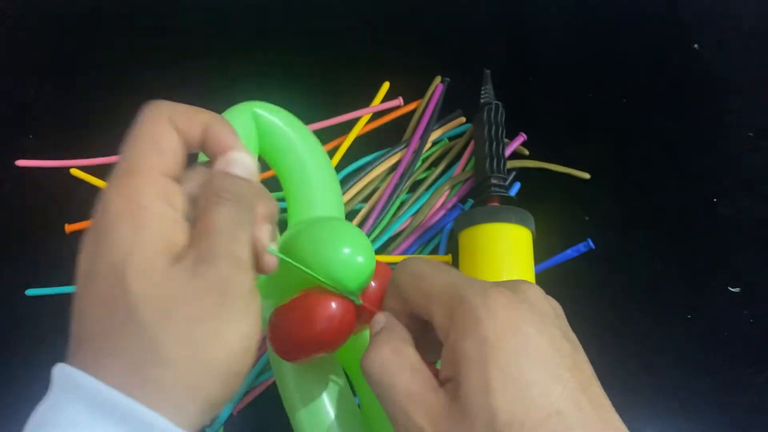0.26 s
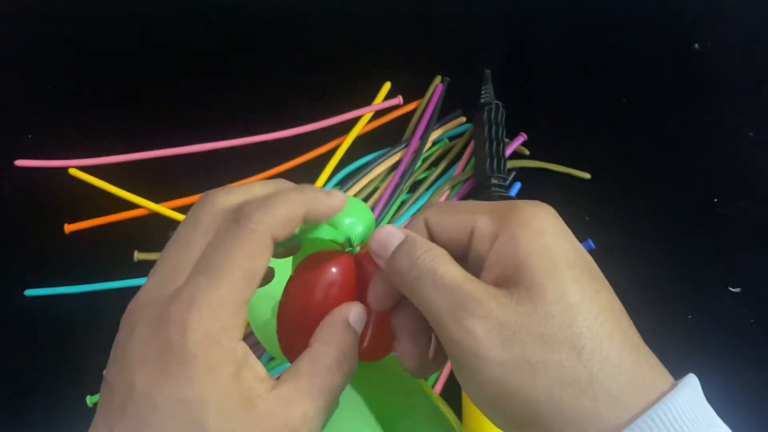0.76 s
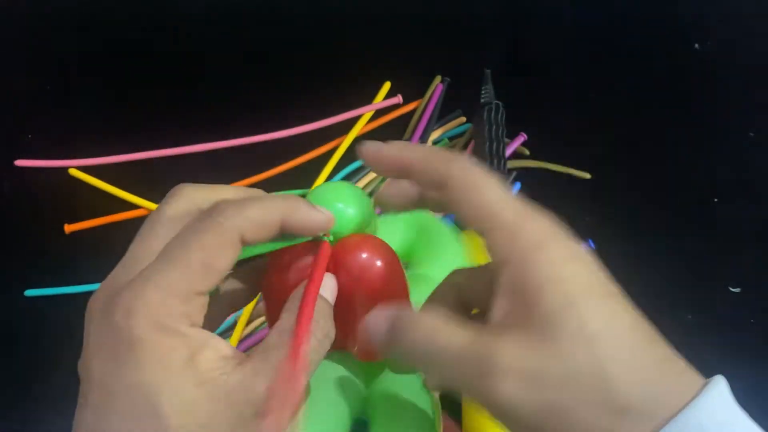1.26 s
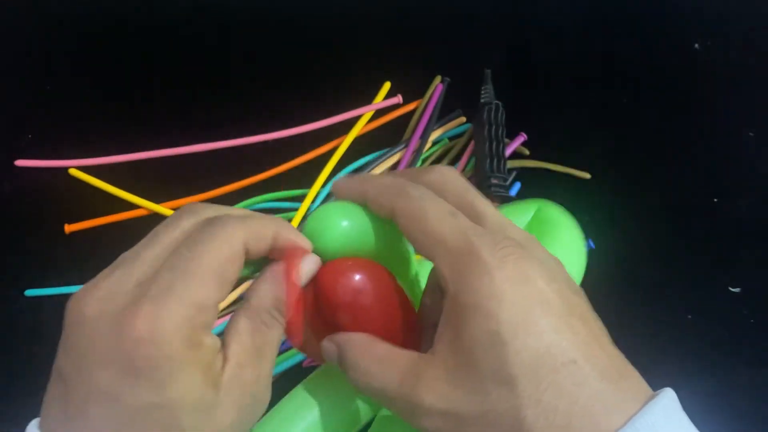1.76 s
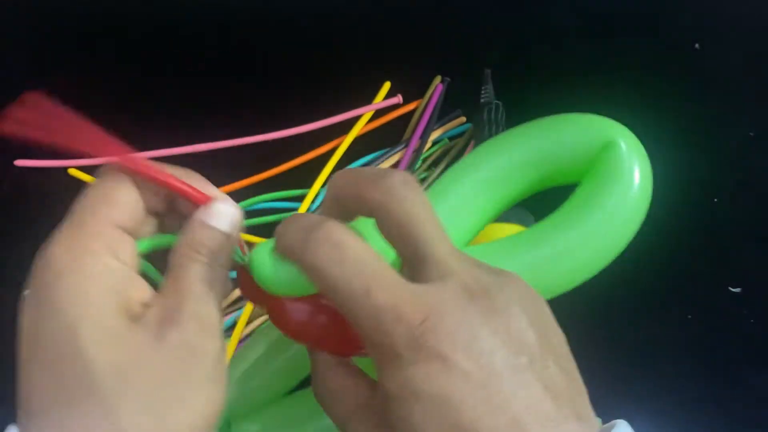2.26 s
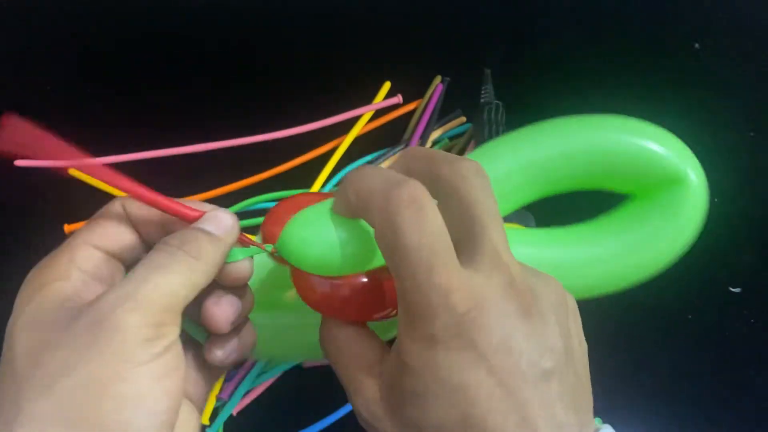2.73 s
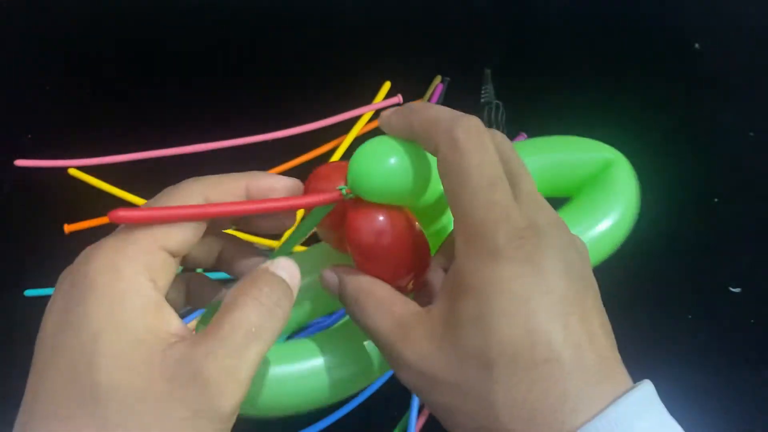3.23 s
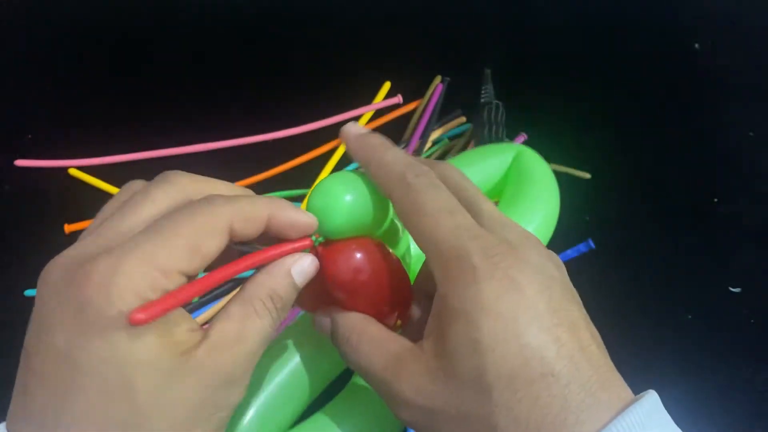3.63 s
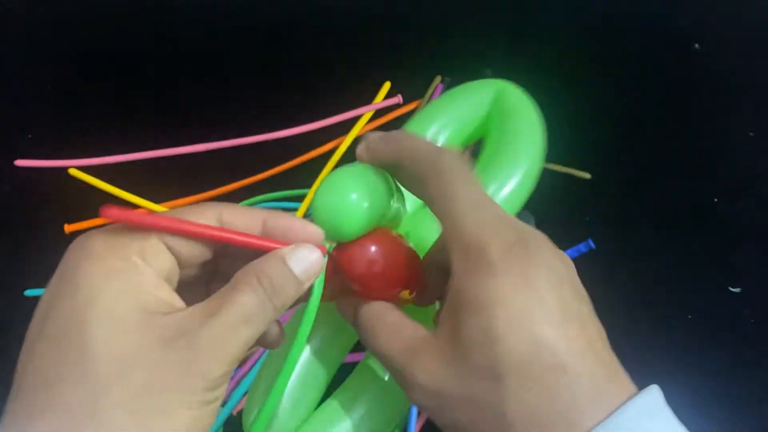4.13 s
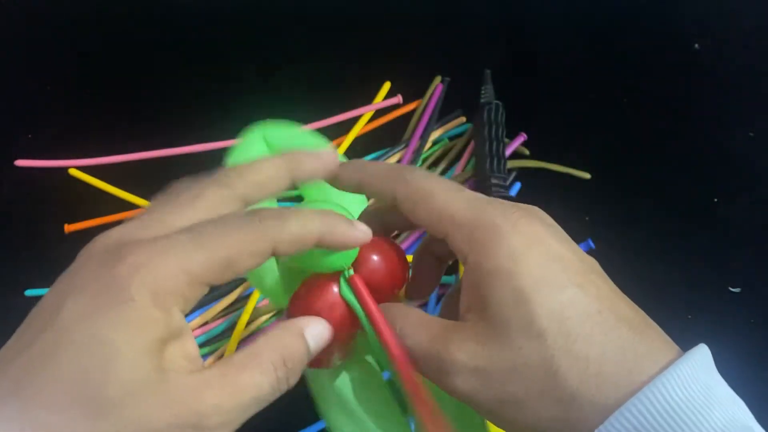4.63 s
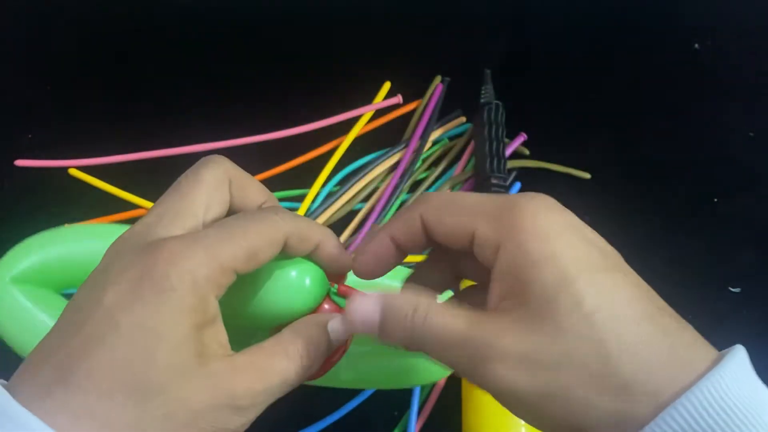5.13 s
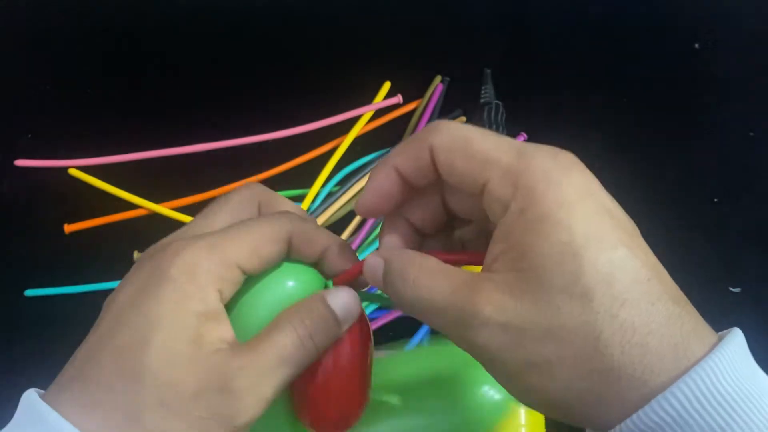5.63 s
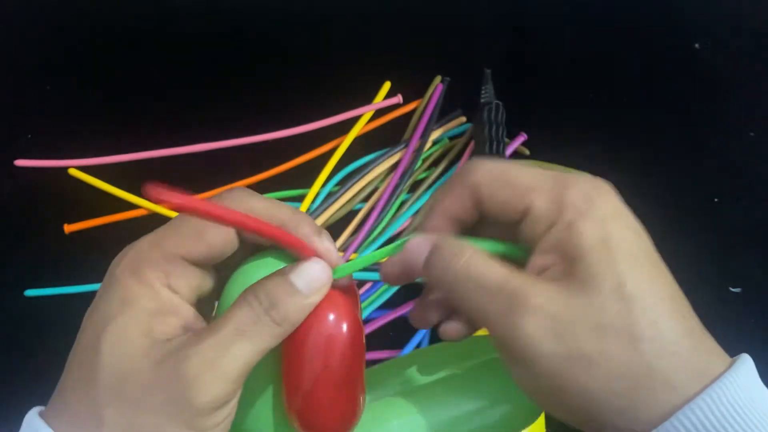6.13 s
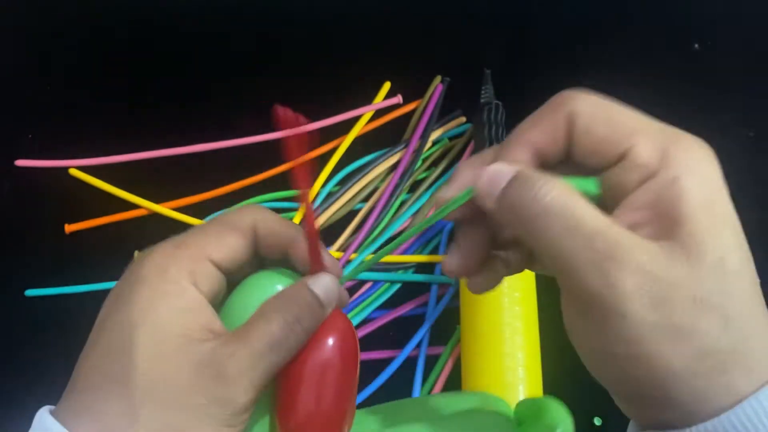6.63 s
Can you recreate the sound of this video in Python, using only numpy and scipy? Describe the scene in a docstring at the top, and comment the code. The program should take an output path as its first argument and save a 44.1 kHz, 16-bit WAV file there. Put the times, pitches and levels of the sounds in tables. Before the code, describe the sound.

Inflated balloons are rubbed, twisted and tied by hand over a table in a small room, heard from very near. Crackly finger strokes and a hollow little boing lead into an uneven run of squeaky rubber snaps, with occasional soft thumps and a low rumble. Toward the end the handling thins into small sharp ticks, a quick tightening creak, short grunting drags and a last pair of slips.

```python
"""In a small room, over a table, hands twist and knot long latex balloons close to the microphone.
The rubber sticks and slips: each slip snaps and sends a wave round the tight skin, highs first.
Fingers swish and crackle over the rubber, pluck hollow falling boings and drag out short grunts.
A pinched neck ticks and a knot creaks tight. The balloon's slowest waves arrive as soft, deep thumps,
mostly just after a slip, and the handling makes a low rumble."""
import sys
import numpy as np
from scipy import signal
from scipy.fft import rfft, irfft, next_fast_len
from scipy.io import wavfile
from scipy.ndimage import map_coordinates

SR = 44100
rng = np.random.default_rng(int(sys.argv[2]) if len(sys.argv) > 2 else 0)


def dump(signal):
    """Clip the signal to [-1, 1] and save it as 16-bit WAV at the path in sys.argv[1]."""
    limited = np.clip(np.atleast_2d(signal).T, -1, 1)
    pcm = np.round(limited * 32767).astype(np.int16)
    wavfile.write(sys.argv[1], SR, pcm)


N = 303849
SIZE = 4096  # samples in one short sound
HZ = np.maximum(np.fft.rfftfreq(SIZE, 1 / SR), 1)  # the frequencies in a short sound
AGE = np.arange(SIZE) / SR  # seconds since it began
SIDES = np.array([[1], [-1]])  # left, right

# slips of the rubber: t/s, ring level/dB, ring f/Hz, snap level/dB, sway level/dB
SLIPS = [(0.056, -50.5, 1280, -55.5, -86), (.169, -52, 1630, -58.5, -70.5),
         (0.3276, -51, 2300, -49.5, -57.5), (0.3548, -38, 1340, -37.5, -49.5),
         (0.4134, -34, 1460, -35.5, -53), (0.4286, -38, 874, -43, -44), (0.7436, -44, 1166, -53, -47.5),
         (.758, -41, 1100, -46, -48.5), (0.8271, -36.5, 970, -43.5, -35), (0.9243, -36, 691, -55, -45),
         (0.9406, -39.5, 1040, -47, -40), (1.056, -53.5, 1490, -62.5, -56.5),
         (1.206, -48.5, 1050, -57, -48.5), (1.228, -47.5, 1650, -60.5, -60), (1.2692, -52, 910, -55.5, -53),
         (1.3079, -38, 1010, -53, -41.5), (1.388, -44.5, 1076, -53.5, -45), (1.4494, -37.5, 1360, -65, -50),
         (1.4811, -48, 1330, -52.5, -52), (1.7835, -32, 1246, -37, -39.5), (1.797, -43.5, 1320, -52, -56),
         (1.8169, -40.5, 1660, -44, -47), (1.8552, -50, 1460, -41, -43.5), (1.8884, -45.5, 840, -55, -47),
         (1.913, -44.5, 1300, -51.5, -46.5), (1.9622, -47, 1300, -51, -51), (1.976, -42, 1400, -50.5, -47),
         (1.996, -46.5, 1370, -54, -48), (2.0096, -43.5, 965, -49, -44), (2.02, -41, 540, -55.5, -35),
         (2.104, -44.5, 1810, -56.5, -56.5), (2.1498, -37, 1030, -43, -43.5),
         (2.19, -40.5, 940, -51.5, -42.5), (2.213, -35, 986, -45.5, -38), (2.231, -44.5, 544, -58.5, -77),
         (2.3297, -27.5, 1570, -33.5, -36.5), (2.5117, -38.5, 1290, -46, -51),
         (2.525, -30.5, 1485, -43, -39.5), (2.568, -39.5, 790, -66, -49), (2.621, -38.5, 1400, -47.5, -37),
         (2.6395, -30, 906, -39, -35), (2.771, -36.5, 1150, -49.5, -52),
         (2.8267, -34.5, 1200, -40.5, -35.5), (2.878, -34.5, 1454, -39.5, -40.5),
         (2.9635, -40.5, 897, -51, -52), (2.997, -46, 820, -57.5, -51.5), (3.101, -38, 1296, -47, -47),
         (3.1468, -44, 744, -54.5, -50.5), (3.195, -40.5, 1030, -41, -44.5), (3.204, -43, 960, -52, -59),
         (3.5786, -44.5, 890, -54, -74), (3.598, -46.5, 1370, -52.5, -58),
         (3.7009, -35.5, 1030, -42.5, -49), (3.7485, -38.5, 1430, -35, -45),
         (3.8454, -51, 1103, -61.5, -57.5), (3.94, -33, 756, -44, -43.5), (4.0066, -39, 1030, -51, -60),
         (4.0391, -40.5, 1220, -46, -52), (4.059, -34.5, 980, -39.5, -51), (4.1866, -41, 1700, -49.5, -51),
         (4.2297, -23, 1080, -31, -41), (4.3272, -41, 1810, -46.5, -48), (4.44, -42, 860, -50, -75),
         (4.46, -48, 1770, -53.5, -54), (4.555, -40.5, 980, -44.5, -59), (4.815, -45.5, 1380, -52, -53),
         (4.8562, -43.5, 796, -62, -51), (4.8851, -43, 1610, -49.5, -49), (4.898, -34.5, 1200, -40.5, -39),
         (4.9713, -46, 2050, -53, -74), (5.075, -49.5, 1230, -54.5, -70), (5.0901, -48, 1160, -51.5, -79),
         (5.2193, -39, 1055, -47.5, -85), (5.527, -50.5, 1420, -54, -48.5),
         (5.6835, -43.5, 1160, -51, -48.5), (5.904, -52.5, 1136, -59.5, -57),
         (5.9786, -48.5, 1310, -51.5, -56), (6.0343, -46.5, 1420, -46.5, -48),
         (6.1344, -47.5, 884, -65, -50.5), (6.3041, -40.5, 560, -55, -38.5),
         (6.5066, -47.5, 1420, -57, -55.5), (6.68, -55, 860, -63.5, -63.5),
         (6.8226, -34, 960, -44.5, -49.5), (6.8434, -39, 903, -79, -50.5)]
# tone colour of a snap: f/Hz, level/dB
SNAP_COLOUR = [(900, -21.5), (2000, -2.5), (3000, 4.5), (4700, 0.5), (6800, -2), (8400, -6), (10000, 1.5),
               (11300, -6.5), (12300, -15.5), (14000, -7.5), (16000, -28)]


def from_db(db):
    """Turn decibels into a gain to multiply by."""
    return 10 ** (np.asarray(db) / 20)


def at_hz(points, hz):
    """Read between the rows of a table, with frequency spaced in octaves."""
    freqs, values = np.transpose(points)
    return np.interp(np.log(np.maximum(hz, 1)), np.log(freqs), values)


def add(out, s, sound):
    """Mix a short sound in at s seconds."""
    start = int(np.clip(round(s * SR), 0, N - 1))
    out[:, start:start + sound.shape[1]] += sound[:, :N - start]


def stereo_noise(size, colour=None):
    """Noise of strength 1, alike on both sides in the bass and unrelated in the treble."""
    # how alike scattered sound is at the two microphones: f/Hz, likeness (1 = the same)
    likeness = [(60, 0.94), (300, 0.73), (700, 0.7), (1400, 0.063), (2500, 0.019)]
    length = next_fast_len(size)
    hz = np.fft.rfftfreq(length, 1 / SR)
    mid, side = rfft(rng.standard_normal((2, length)))
    alike = at_hz(likeness, hz)
    spectrum = np.sqrt(1 + alike) * mid + np.sqrt(1 - alike) * side * SIDES
    gain = from_db(at_hz(colour, hz)) if colour else 1
    x = irfft(spectrum * gain, length)[:, :size]
    return x / x.std()


def resonance(centre_hz, q):
    """Favour one pitch; a higher q rings longer and purer."""
    return 1 / (1 + 1j * q * (HZ / centre_hz - centre_hz / HZ))


def travel(seconds, centre_hz, spread=.7):
    """Low waves cross the skin more slowly than high ones, so a click becomes a falling chirp."""
    power = 1 - spread
    return np.exp(-2j * np.pi * seconds * centre_hz * (HZ / centre_hz) ** power / power)


def scatter(fade_s, echo_db):
    """The direct wave plus its echoes among balloons and hands, which fall 60 dB in fade_s."""
    echoes = stereo_noise(SIZE) * from_db(-60 * AGE / fade_s)
    echoes /= np.sqrt(np.sum(echoes ** 2) / 2)
    return 1 + from_db(echo_db) * rfft(echoes)


def burst(spectrum):
    """Turn a spectrum into a short sound with the energy of 10 ms at strength 1."""
    end_fade = np.minimum(1, 4 * (1 - AGE / AGE[-1]))
    x = irfft(spectrum) * end_fade
    return x / np.sqrt(np.sum(x ** 2) / 2 / (SR / 100))


def sharp_pulse(colour):
    """Spectrum of the shortest click with this tone colour that does not sound early."""
    cepstrum = irfft(np.log(from_db(at_hz(colour, HZ))))
    forward_only = np.r_[1, np.full(SIZE // 2 - 1, 2), 1, np.zeros(SIZE // 2 - 1)]
    return np.exp(rfft(cepstrum * forward_only))


def clumps(per_s):
    """The grip comes and goes: a random curve between -2 and 1."""
    grip = map_coordinates(rng.standard_normal(N), [np.arange(N) / SR * per_s], order=1)
    return np.clip(grip, -2, 1)


def still_air(level_db=-72.5):
    """The faint, steady hush of the room."""
    # tone colour of the hush: f/Hz, level/dB
    colour = [(150, -2.5), (700, 0.5), (1500, -13.5), (3000, -16), (8400, -40.5), (10000, -33.5),
              (12200, -37), (16000, -47.5)]
    return from_db(level_db) * stereo_noise(N, colour)


def rumble():
    """Handling makes a low rumble, strongest while the balloon figure is turned over."""
    # loudness of the rumble: t/s, level/dB
    levels = [(0, -68), (.5, -58), (1.7, -61), (2.8, -51), (3.45, -60), (3.85, -55), (4.45, -60.5),
              (4.9, -56), (6.89, -67.5)]
    # its tone colour: f/Hz, level/dB
    colour = [(24, -62), (33, -35), (46, 4), (70, 5), (100, -5), (160, -5.5), (300, -23.5), (800, -74.5)]
    level_db = np.interp(np.arange(N) / SR, *np.transpose(levels))
    return from_db(level_db) * stereo_noise(N, colour)


def stroke_gains(swell_share=.15, sag_db_per_s=20.5, release_s=.029, resting_db=-89):
    """Gains for crackle and hiss: each finger stroke swells, eases off and lets go."""
    # strokes over the rubber: start/s, end/s, crackle level/dB, hiss level/dB
    strokes = [(0.376, 0.514, -47, -65), (0.575, 0.68, -53, -73.5), (0.784, 1.064, -56.5, -90),
               (1.209, 1.34, -49, -69.5), (1.405, 1.726, -54.5, -80), (1.788, 2.033, -52.5, -86),
               (2.184, 2.188, -43.5, -56), (2.79, 3.19, -54, -70), (3.678, 3.689, -40.5, -86),
               (3.996, 4.096, -43.5, -68), (4.479, 4.571, -55.5, -81), (4.734, 4.96, -55.5, -63.5),
               (5.006, 5.168, -55, -90), (5.317, 5.48, -47, -75), (5.729, 5.738, -48, -59.5),
               (5.928, 6.093, -53.5, -64), (6.229, 6.338, -57.5, -56)]
    age = np.arange(SR) / SR
    power = np.full((2, N), from_db(resting_db) ** 2)
    for start, end, crackle_db, hiss_db in strokes:
        length = max(end - start, .01)
        hold = np.tanh(age / (swell_share * length)) * from_db(-sag_db_per_s * age)
        release = np.exp(-np.maximum(age - length, 0) / release_s)
        add(power, start, (from_db([[crackle_db], [hiss_db]]) * hold * release) ** 2)
    return np.sqrt(power)


def creep_gain(against_snap_db=-16, rise_s=.003):
    """Gain of the hiss just before each slip: the rubber slides faster and faster, then lets go."""
    gain = np.zeros((1, N))
    ramp = np.exp(-AGE[:SIZE // 4][::-1] / rise_s)
    for s, _, _, snap_db, _ in SLIPS:
        add(gain, s - len(ramp) / SR, from_db(snap_db + against_snap_db) * ramp[None])
    return gain


def swishes(gain, boost_db=2, spurt_db=8.5):
    """Sliding skin hisses in uneven spurts."""
    # tone colour of the hiss: f/Hz, level/dB
    colour = [(400, -20), (1200, 6), (3000, 1), (6500, 1.5), (8400, -9), (10000, 4.5), (11300, -1),
              (12300, -11), (14000, -9), (16000, -14)]
    return gain * from_db(boost_db + spurt_db * clumps(per_s=130)) * stereo_noise(N, colour)


def skin_ring(centre_hz, travel_s, q, top_hz=6000, hum_db=-30):
    """The tight skin chirps and hums briefly; the wave comes round again, weaker and more drawn out."""
    lap_s = 3 / centre_hz * rng.uniform(.5997, 1.5)
    second_lap = from_db(-8) * rng.choice([-1, 1]) * travel(lap_s, centre_hz)
    tone = resonance(centre_hz, q) + from_db(hum_db) * resonance(.878 * centre_hz, q=6.6)
    treble_cut = 1 / (1 + np.sqrt(2) * 1j * HZ / top_hz - (HZ / top_hz) ** 2)
    tone *= resonance(centre_hz, q=.22) * treble_cut
    chirp = tone * travel(travel_s, centre_hz, spread=rng.uniform(.403, .85))
    return burst(chirp * (1 + second_lap) * scatter(fade_s=26 / centre_hz, echo_db=-3))


def contact_snap(pulse, judder_db=-2, judder_s=.024):
    """The rubber lets go: one sharp pulse and a brief judder."""
    return burst(pulse * scatter(judder_s, judder_db))


def body_sway(skin_hz):
    """The slow wave of the whole balloon; tighter, higher-ringing skin also sways faster."""
    hz = 350 * np.sqrt(skin_hz / 1000)
    wave = resonance(hz, q=.54) ** 2 * travel(1.573 / hz, hz)
    return burst(wave * scatter(fade_s=.097, echo_db=-.5))


def slips(long_above_db=-41.5, db_per_doubling=8):
    """Each slip snaps, rings and sways the balloon; a soft one is slower, duller and purer."""
    # Each pair gives the softest slip, then the sharpest.
    # snap compared with ring: level/dB
    hardness_db = [-14.5, -2]
    # purity of the ring: q
    ring_q = [1.6, 0.55]
    # the wave's trip over the skin, before a long slide stretches it: length/cycles
    trip_cycles = [1.895, 1.148]
    # where the ring's treble falls away: f/Hz
    ring_top_hz = [2100, 5430]
    # hum within the ring: level/dB
    ring_hum_db = [-3.5, -16]
    # smearing of the snap, before a long slide stretches it: t/ms
    snap_smear_ms = [0.889, 0.3525]
    pairs = ring_q, trip_cycles, ring_top_hz, ring_hum_db, snap_smear_ms
    # weak slips judder, strong ones let go cleanly: snap level/dB, judder compared with pulse/dB
    judder = [(-55.5, 4), (-38, -4.5)]
    out, pulse = np.zeros((2, N)), sharp_pulse(SNAP_COLOUR)
    for s, ring_db, hz, snap_db, sway_db in SLIPS:
        settings = [np.interp(snap_db - ring_db, hardness_db, pair) for pair in pairs]
        q, cycles, top_hz, hum_db, smear_ms = settings
        slide = 2 ** (max(snap_db - long_above_db, 0) / db_per_doubling)  # hard slips slide further
        ring = from_db(ring_db) * skin_ring(hz, np.sqrt(slide) * cycles / hz, q, top_hz, hum_db)
        smeared = pulse * travel(slide * smear_ms / 1000, centre_hz=4098)
        snap = from_db(snap_db) * contact_snap(smeared, np.interp(snap_db, *np.transpose(judder)))
        pan = from_db(SIDES * rng.normal() / 2)
        add(out, s, (ring + snap) * pan + from_db(sway_db) * body_sway(hz))
    return out


def low_thumps(boost_db=2):
    """Soft, deep thumps as the balloon's slowest waves arrive, mostly just after a slip."""
    # the slowest waves arrive: t/s, level before the boost/dB, f/Hz
    arrivals = [(.087, -52, 240), (0.96, -40.5, 77), (1.267, -40.5, 104), (2.343, -40.5, 83.8),
                (2.643, -37, 103), (2.666, -45, 55), (2.915, -45.5, 74.1), (4.863, -43, 90),
                (6.03, -44, 113)]
    out = np.zeros((2, N))
    for s, db, hz in arrivals:
        thump = resonance(hz, q=.97) ** 2 * travel(.005, hz) * scatter(fade_s=.25, echo_db=-3)
        add(out, s - .006, from_db(db + boost_db) * burst(thump))
    return out


def crackle(gain, per_s=340, centre_hz=850, clump_db=3.5):
    """Tiny hollow slips come in clumps while the fingers creep over the rubber."""
    gain = gain * from_db(clump_db * clumps(per_s=45))
    out, pulse = np.zeros((2, N)), sharp_pulse(SNAP_COLOUR)
    pitches = centre_hz * 2 ** np.linspace(-1.1, 1.1, 24)
    rings = [skin_ring(hz, travel_s=.002, q=2.2, hum_db=-3) for hz in pitches]
    snaps = [contact_snap(pulse, judder_s=.008) for _ in rings]
    for when, chance, sharpness, kind in rng.random((int(per_s * N / SR), 4)):
        k = int(kind * len(rings))
        grain = rings[k] + from_db(-20 + 12 * sharpness) * snaps[k]
        size = min(-np.log(chance), 2.5)  # many small slips, few big ones
        add(out, when * N / SR, grain * gain[int(when * N)] * from_db(-10.5 + 2.5 * size))
    return out


def plucks(roughness=.32, rough_hz=900):
    """Plucked skin boings, sinking in pitch as the dent relaxes; the dragging finger roughens it."""
    # fingertip plucks: t/s, level/dB, starting f/Hz, settled f/Hz, swell/s, fade/s
    boings = [(0.397, -39, 980, 887, 0.0041, 0.0054), (0.415, -22, 733, 504, 0.0018, 0.0038),
              (.516, -43.5, 478, 311, 0.0037, 0.011), (0.679, -49.5, 524, 368, 0.0049, 0.0054),
              (1.131, -43.5, 795, 536, 0.0046, 0.0084), (1.265, -44, 583, 280, 0.0027, 0.008),
              (2.011, -31, 614, 282, 0.003, 0.0015), (4.151, -49.5, 757, 459, 0.0017, 0.002),
              (5.354, -45, 890, 720, 0.0016, 0.0031), (5.388, -44, 980, 706, 0.0009, 0.0017)]
    # the tones in one boing: multiple of the pitch, level/dB
    partials = [(1, -3.5), (1.55, -13.5), (2.45, -16)]
    out = np.zeros((2, N))
    for s, db, start_hz, settled_hz, swell_s, fade_s in boings:
        hz = settled_hz + (start_hz - settled_hz) * np.exp(-AGE / (swell_s + fade_s))
        phase = 2 * np.pi * np.cumsum(hz) / SR
        tone = sum(from_db(partial_db) * np.sin(ratio * phase) for ratio, partial_db in partials)
        envelope = np.minimum(AGE / swell_s, 1) * np.exp(-np.maximum(AGE - swell_s, 0) / fade_s)
        drag = 1 + roughness * map_coordinates(rng.standard_normal(SIZE), [AGE * rough_hz], order=1)
        body = resonance(settled_hz, q=.24) * scatter(fade_s=.16, echo_db=-11)
        add(out, s, from_db(db) * burst(rfft(tone * envelope * drag) * body))
    return out


def grunts(swell_share=.35, loss_db_per_octave=2):
    """Rubber sticks and slips, slowing as the finger stops; the hollow inside favours some overtones."""
    # finger drags: t/s, length/s, level/dB, starting f/Hz, final f/Hz, hollow f/Hz
    drags = [(0.433, .016, -37.5, 298, 233, 390), (0.594, 0.012, -39, 312, 238, 540),
             (0.617, 0.012, -42.5, 308, 238, 537), (2.3288, 0.016, -28.5, 454.4, 317, 393),
             (2.644, 0.011, -33.5, 283, 150, 224), (6.2227, 0.018, -32.5, 299, 275, 736),
             (6.28, 0.023, -40, 319, 298, 865), (6.298, .022, -32.5, 324, 258, 330)]
    out = np.zeros((2, N))
    for s, length, db, start_hz, final_hz, hollow_hz in drags:
        hz = np.interp(AGE, [0, length], [start_hz, final_hz])
        phase = 2 * np.pi * np.cumsum(hz) / SR
        tone = sum(from_db(-loss_db_per_octave * np.log2(k)) * np.cos(k * phase) for k in range(1, 13))
        envelope = np.sin(np.pi / 2 * np.interp(AGE / length, [0, swell_share, 1], [0, 1, 0]))
        hollow = resonance(hollow_hz, q=1.4) * resonance(hollow_hz, q=.55)
        body = hollow * travel(.001, hollow_hz) * scatter(fade_s=.03, echo_db=-15)
        add(out, s, from_db(db) * burst(rfft(tone * envelope) * body))
    return out


def ticks(patch_hz=4500, skin_hz=1600):
    """A sharp pulse hits a small, stiff patch of rubber; a fainter chirp runs on into the skin."""
    # the thin pinched neck lets go: t/s, level/dB
    releases = [(1.128, -55.5), (5.2728, -48.5), (5.2912, -41), (5.3108, -42), (5.326, -41), (5.429, -59)]
    out, pulse = np.zeros((2, N)), sharp_pulse(SNAP_COLOUR)
    for s, db in releases:
        patch = burst(resonance(patch_hz, q=7.1) * scatter(fade_s=.0099, echo_db=4))
        skin = skin_ring(skin_hz, travel_s=2 / skin_hz, q=.73)
        snap = contact_snap(pulse, judder_db=-4)
        add(out, s, from_db(db) * (patch + from_db(-3) * snap + from_db(-4) * skin))
    return out


def creak_ring(centre_hz=900, top_hz=2100, lap_s=.00176):
    """A click runs round a small bubble, heard as a falling chirp and then a weaker one."""
    second_lap = from_db(-3) * travel(lap_s * rng.uniform(.78, 1.173), centre_hz, spread=.23)
    treble_cut = 1 / (1 + 1j * HZ / top_hz - (HZ / top_hz) ** 2)
    chirp = resonance(centre_hz, q=.31) * treble_cut ** 3 * travel(.001617, centre_hz)
    return burst(chirp * (1 + second_lap) * scatter(fade_s=.014, echo_db=-4.5))


def creaks(hurry=.68, shortest_gap_s=.007, jitter=.3, peak_share=.9, rise_db=11.5, fall_db=13.5):
    """In each pull the slips crowd together, grow and get less regular, until the rubber gives."""
    # the rubber is drawn tight: start/s, end/s, first gap/s, peak level/dB
    pulls = [(1.291, 1.317, .008, -44.5), (4.014, 4.053, 0.01, -43.5), (5.565, 5.679, .0245, -33)]
    out, pulse = np.zeros((2, N)), sharp_pulse(SNAP_COLOUR)
    for start, end, first_gap, peak_db in pulls:
        snap = contact_snap(pulse)
        sway = from_db(-9) * body_sway(skin_hz=1900)
        s, count = start, 0
        while s < end:
            progress = (s - start) / (end - start)
            db = np.interp(progress, [0, peak_share, 1], [-rise_db, 0, -fall_db]) + rng.normal()
            slip = creak_ring() + sway + from_db(-11 + db / 2) * snap  # harder slips snap more
            add(out, s, from_db(db + peak_db) * slip)
            count += 1
            gap = max(first_gap / count ** hurry, shortest_gap_s)
            s += gap * np.exp(jitter * progress * rng.normal())
    return out


def placed(x):
    """The hands work a little to the left, so the two microphones hear them differently."""
    # how much louder the left side is: f/Hz, level/dB
    balance = [(100, -2.5), (260, -2.5), (600, 2), (2000, 5), (4500, 7.5), (8000, 0.5)]
    # how far ahead the left side's wave is: f/Hz, phase/radians
    phase_lead = [(0, 0), (3010, 3), (3360, 3.5), (4220, 0.5), (6460, 0.82), (7840, -2), (9730, -6.5),
                  (10500, -7.5), (11700, -17.5), (12400, -11.5)]
    size = next_fast_len(N + SIZE)
    hz = np.fft.rfftfreq(size, 1 / SR)
    pan = from_db(SIDES * at_hz(balance, hz) / 2)
    lead = np.exp(1j * SIDES * np.interp(hz, *np.transpose(phase_lead)) / 2)
    return irfft(rfft(x, size) * pan * lead, size)[:, :N]


def room(x, tail_db=-13, echo_db=-13, echo_s=.009):
    """One early echo from nearby, then a short wash of blended echoes."""
    # tone colour of the wash: f/Hz, level/dB
    colour = [(100, 1), (400, -2), (1000, 1.5), (3000, 3), (8000, 1)]
    # time the wash takes to fall 60 dB: f/Hz, t/s
    fades = [(150, 0.31), (1000, 0.3), (4000, 0.32), (14000, 0.25)]
    age = np.arange(SR // 2) / SR
    hz = np.fft.rfftfreq(len(age), 1 / SR)
    noise = rfft(stereo_noise(len(age), colour))
    centres, fade_times = np.transpose(fades)
    tail = 0
    for share, fade_s in zip(np.eye(len(fades)), fade_times):
        band = irfft(noise * at_hz(list(zip(centres, share)), hz), len(age))
        tail += band * from_db(-60 * age / fade_s)
    tail *= np.clip(age / echo_s - .5, 0, 1)
    echo = stereo_noise(len(age)) * (age > echo_s) * np.exp(-np.abs(age - echo_s) / .00048)
    response = sum(from_db(db) * part / np.sqrt(np.sum(part ** 2) / 2)
                   for db, part in [(tail_db, tail), (echo_db, echo)])
    return signal.fftconvolve(x, response, axes=1)[:, :N]


def scene():
    """Rubber sounds in the room, over handling rumble and still air."""
    air, handling = still_air(), rumble()
    crackle_gain, hiss_gain = stroke_gains()
    rubber = swishes(hiss_gain + creep_gain()) + slips() + low_thumps() + crackle(crackle_gain)
    rubber += plucks() + grunts() + ticks() + creaks()
    return placed(rubber + handling) + room(rubber) + air


def record(dry):
    """The very highest treble, above 16400 Hz, is cut steeply."""
    return signal.sosfilt(signal.ellip(10, .1, 90, 16400, fs=SR, output="sos"), dry)


dry = scene()
out = record(dry)
dump(out)
```